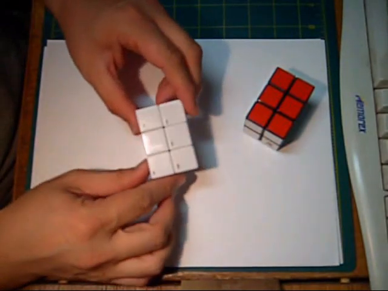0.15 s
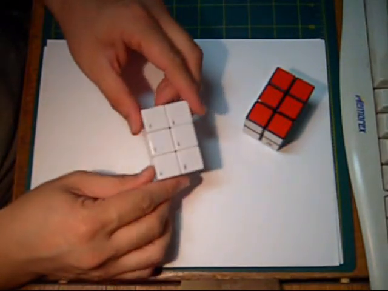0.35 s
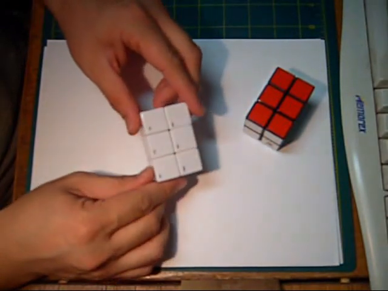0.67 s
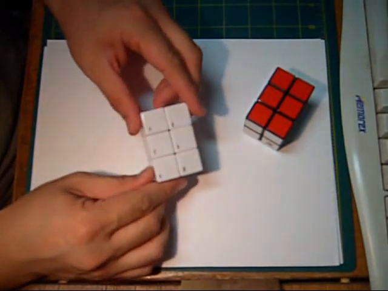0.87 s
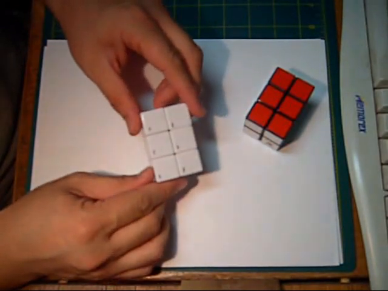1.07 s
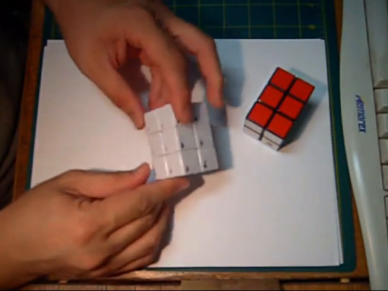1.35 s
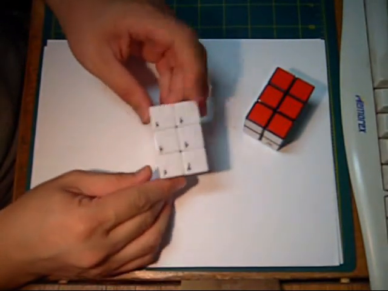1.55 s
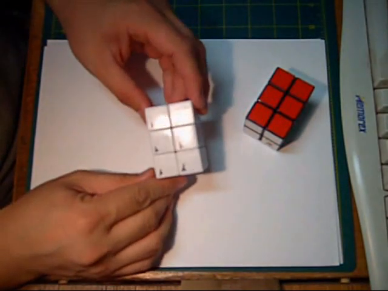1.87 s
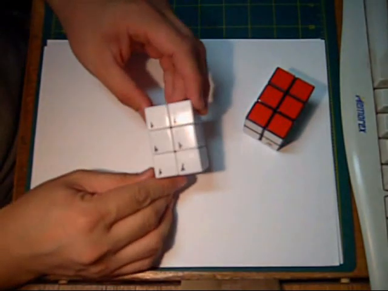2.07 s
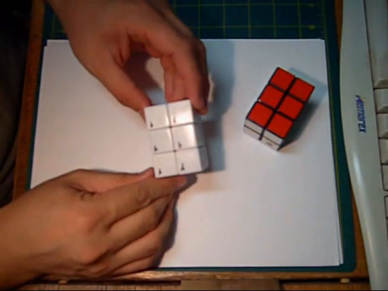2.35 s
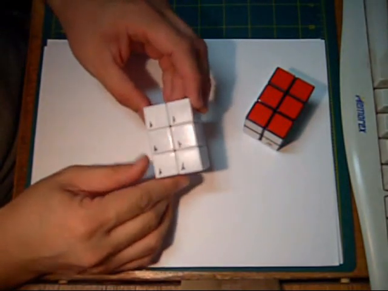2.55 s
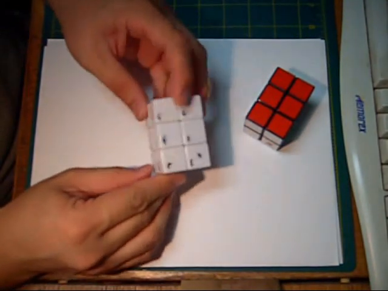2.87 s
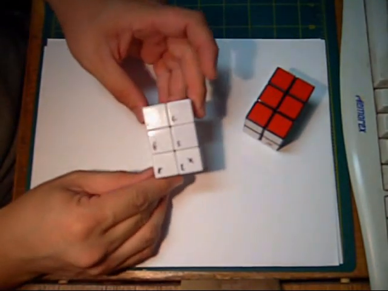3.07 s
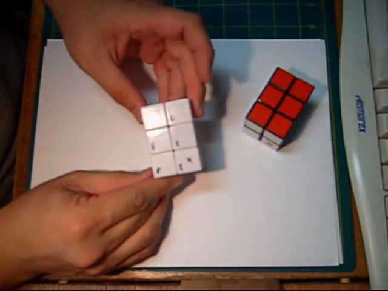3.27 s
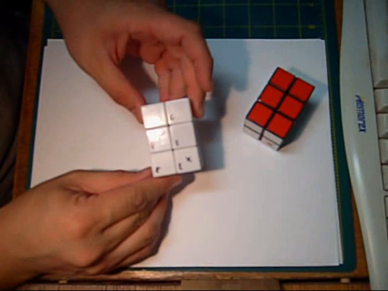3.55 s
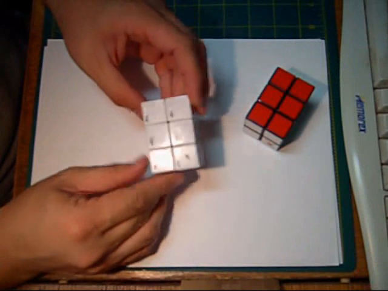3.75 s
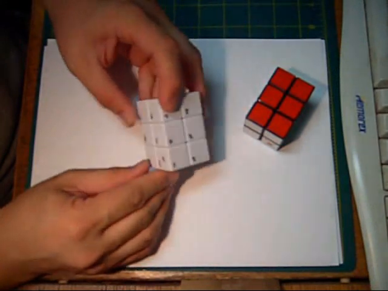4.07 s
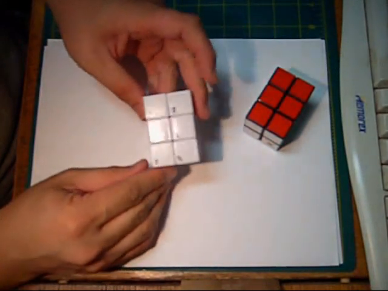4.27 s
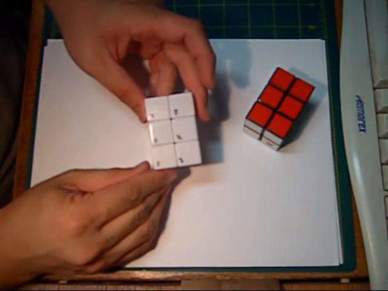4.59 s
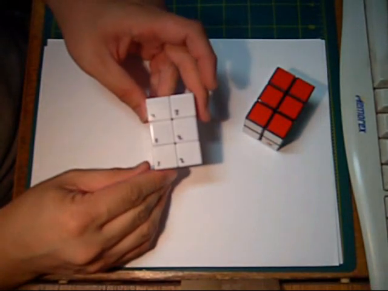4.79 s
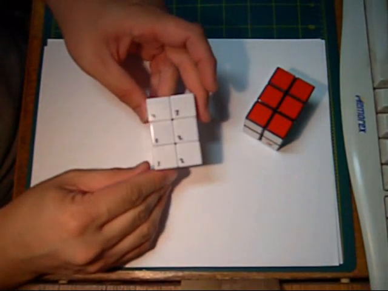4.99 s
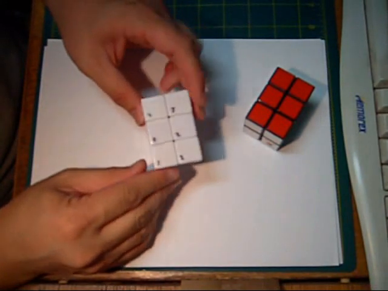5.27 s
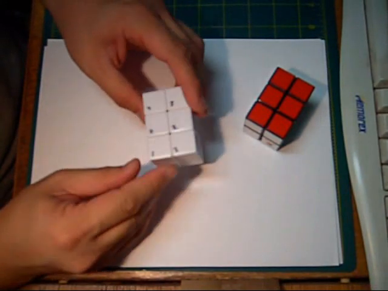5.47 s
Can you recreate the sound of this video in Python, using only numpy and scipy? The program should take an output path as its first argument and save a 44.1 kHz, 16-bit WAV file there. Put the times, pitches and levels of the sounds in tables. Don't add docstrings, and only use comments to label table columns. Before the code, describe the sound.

Throughout about 5.5 seconds, a computer idles near a desk in a quiet room. Its fan holds a nearly constant whine around 520 Hz, with fluttering, rough overtones near 1 and 2 kHz, over a soft rush of air. Low mains and disk hums near 50 and 120 Hz sit beneath, and faint building rumble swells irregularly, more noticeably around 2.7 and 4.2-4.4 seconds. At about 1.16-1.18 seconds a plastic puzzle block makes a quick rattle ending in one sharp, dry click, with a weaker hollow knock at 1.23. Soft fingertip rubs follow at about 1.2, 1.4 and 1.6 seconds, a tiny tick at 1.78, and a barely audible touch at 2.36. Then only the machine continues, without fading. The cheap low-resolution camera microphone adds grainy hiss and thin, glassy high mirror tones.

```python
import sys
import numpy as np
from scipy import signal
from scipy.fft import rfft, irfft, next_fast_len
from scipy.io import wavfile
from scipy.ndimage import uniform_filter1d, map_coordinates

SR = 44100
rng = np.random.default_rng(int(sys.argv[2]) if len(sys.argv) > 2 else 0)


def wav_out(sig):
    wavfile.write(sys.argv[1], SR, np.round(np.clip(np.atleast_2d(sig).T, -1, 1) * 32767).astype(np.int16))


def field_ratio(decibels):
    return 10 ** (np.asarray(decibels, dtype=float) / 20)


N = 248180

# t/s, fourth blade overtone f/Hz
FAN_DRIFT = [
    (0.1, 2090),
    (5.5, 2097),
]
# multiple of blade pitch, rms level/dB, eddy noise level/dB
BLADE_OVERTONES = [(1, -32.5, -31.5), (2, -44, -13), (3, -49, -12.5), (4, -44, -19), (5, -56, -8.5),
                   (6, -56, -13), (7, -62.5, -7)]
# multiple of shaft speed, rms level/dB
SHAFT_TONES = [
    (1, -53.5),
    (8, -56.5),
]
# f/Hz, rms level/dB, unsteadiness/dB
HUM_TONES = [
    (49.96, -39.8, 1.5),
    (120.35, -39.5, 1),
    (99.77, -58, 1),
    (149.85, -58, 0.5),
    (200.7, -58, 2),
]
# f/Hz, density level/dB
AIR_SPECTRUM = [(30, -21), (60, -0.5), (130, -8.5), (250, -12.5), (370, -16), (480, -11.5), (900, -15),
                (1250, -16.5), (1900, -16.5), (2350, -18), (3000, -20), (3500, -20), (4000, -23),
                (5000, -62.5)]
# f/Hz, width/Hz, boost/dB
CASE_MODES = [(200.2, 12, 4), (307, 30, 4), (747, 50, 4.5), (1013.7, 45, 7), (653, 25, 4), (1308, 36, 2.5),
              (1568, 120, 2), (2000, 100, 0.5), (2450, 110, 1.5)]
# f/Hz, density level/dB
RUMBLE_SPECTRUM = [(3, -30), (8, -8), (13, -2), (19, 0), (30, -6), (42, -9), (60, -17), (90, -35)]
# t/s, rise/dB, half length/s
RUMBLE_SWELLS = [(0.25, 5, 0.068), (0.616, 4.5, 0.1), (1.546, 4.5, 0.081), (2.347, 6, 0.042),
                 (2.681, 10, .18), (3.5, 2, .25), (4.036, 3, 0.041), (4.202, 8.5, 0.048), (4.33, 12, .07),
                 (4.706, 6, 0.09), (5.362, 7, 0.11), (5.52, 4, 0.051)]
# t/s, peak level/dB, ring f/Hz, decay by 60 dB/s
CONTACTS = [(1.1625, -33, 3000, .03), (1.1660, -27, 3100, .02), (1.1700, -27, 3700, .025),
            (1.1730, -23.5, 3900, .02), (1.1776, -10.5, 2100, .0035), (1.1786, -22, 3200, .02),
            (1.1808, -25, 3700, .016), (1.2310, -28, 1100, .035), (1.2335, -27, 1400, .025),
            (1.2585, -35, 2000, .02), (1.2640, -37, 1500, .04), (1.7790, -31, 1950, .03)]
# start t/s, hold/s, level/dB
RUB_STROKES = [
    (1.18, .15, -50),
    (1.41, .13, -48.5),
    (1.58, .05, -53),
    (2.36, .04, -57),
]
# f/Hz, density level/dB
SKIN_SPECTRUM = [(700, -30), (1500, -2), (2200, -5), (3100, 0), (4000, -1), (4500, -20)]
READ_STAIRS = np.array([.1, .1, .235, .265, .43, .43, .54, .585, .73, .79, .93, .93])

DROPOUT_DB, SLIP_TURNS = 1.3, .045
RUMBLE_DB, RESTLESS_DB = -41, 1.5
CONTACT_S = .00012
GRIP_S, LET_GO_DB_PER_S = .02, 91
CAMERA_HZ, TOP_HZ, STEP = 8000, 15730, 1 / 128


def filtered(x, response):
    m = next_fast_len(N + 8192)
    spectrum = rfft(x, m) * response(np.fft.rfftfreq(m, 1 / SR))
    return irfft(spectrum, m)[:N]


def coloured(points, boosts=()):
    hz, db = np.transpose(points)

    def response(f):
        curve = np.interp(np.log(f + 1), np.log(hz + 1), db)
        bells = sum(top * np.exp(-((f - c) / w) ** 2) for c, w, top in boosts)
        return field_ratio(curve + bells)

    x = filtered(rng.standard_normal(N), response)
    return x / np.std(x)


def wobble(rate):
    knots = rng.standard_normal(int(N * rate / SR) + 4)
    return map_coordinates(knots, [np.arange(N) * rate / SR])


def tone(turns):
    return np.sqrt(2) * np.sin(2 * np.pi * (turns + rng.random()))


def fan():
    t = np.arange(N) / SR
    drift_s, fourth_hz = np.transpose(FAN_DRIFT)
    blade_hz = np.interp(t, drift_s, fourth_hz) / 4 + .2 * wobble(8)
    turns = np.cumsum(blade_hz) / SR
    out = sum(field_ratio(db + 2 * wobble(3)) * tone(k * turns / 7) for k, db in SHAFT_TONES)
    for k, db, eddy_db in BLADE_OVERTONES:
        dropout_db = DROPOUT_DB * (k in (2, 3, 6)) * wobble(12)
        sway_db = 0.14 * k * wobble(5) + dropout_db
        slip = SLIP_TURNS * (k > 1) * wobble(15)
        eddies = 1 + field_ratio(eddy_db) * wobble(150)
        out = out + field_ratio(db + sway_db) * eddies * tone(k * turns + slip)
    return out


def air():
    level_db = -39 + 0.25 * wobble(1.7) + .4 * wobble(12)
    return field_ratio(level_db) * coloured(AIR_SPECTRUM, CASE_MODES)


def block():
    out, t = np.zeros(N), np.arange(SR // 10) / SR
    for s, db, hz, t60 in CONTACTS:
        shell = signal.butter(1, [hz * 0.49, hz * 1.8], "bandpass", fs=SR, output="sos")
        rattle = signal.sosfilt(shell, rng.standard_normal(len(t)))
        ring = np.sin(2 * np.pi * hz * t)
        envelope = field_ratio(db - 60 * t / t60) * (1 - np.exp(-t / CONTACT_S))
        out[round(s * SR):][:len(t)] += envelope * (ring + rattle)
    return out


def rub():
    t = np.arange(N) / SR
    press = 0
    for s, hold, db in RUB_STROKES:
        grip = np.clip((t - s) / GRIP_S, 0, 1)
        press = press + grip * field_ratio(db - LET_GO_DB_PER_S * np.maximum(t - s - hold, 0))
    fits = field_ratio(3.2 * wobble(60))
    return press * fits * coloured(SKIN_SPECTRUM, [(1560, 90, 5), (3100, 150, 5)])


def hums():
    t = np.arange(N) / SR
    low = sum(field_ratio(db + shake_db * wobble(3)) * tone(hz * t) for hz, db, shake_db in HUM_TONES)
    comb = sum(field_ratio(-68 - .25 * (k - 39) ** 2) * tone(k * 49.99 * t) for k in range(33, 47))
    return low + comb


def rumble():
    deep = coloured(RUMBLE_SPECTRUM)
    power = np.abs(uniform_filter1d(deep ** 2, size=SR // 6))
    even = deep / np.sqrt(power + 0.056)
    t = np.arange(N) / SR
    swell_db = sum(db * np.exp(-((t - s) / half) ** 2) for s, db, half in RUMBLE_SWELLS)
    return field_ratio(RUMBLE_DB + swell_db + RESTLESS_DB * wobble(7)) * even


def scene():
    return (fan() + air() + block() + rub() + hums() + rumble())[None]


def eight_bits(x):
    return np.floor(x / STEP) * STEP


def low_pass(x):
    return signal.sosfilt(signal.butter(12, 16620, fs=SR, output="sos"), x)


def record(dry):
    smooth = filtered(dry[0], lambda f: 1 / np.sqrt(1 + (f / 3900) ** 16))
    camera_times = np.arange(N * CAMERA_HZ // SR + 3) * SR / CAMERA_HZ
    coarse = eight_bits(np.interp(camera_times, np.arange(N), smooth))
    whole, part = np.divmod(np.arange(N) * CAMERA_HZ, SR)
    stairs = READ_STAIRS[part * len(READ_STAIRS) // SR]
    fine = eight_bits(np.interp(whole + stairs, np.arange(len(coarse)), coarse))
    mix = filtered(fine, lambda f: f < TOP_HZ)[None]
    return low_pass(mix)


dry = scene()
out = record(dry)
wav_out(out)
```